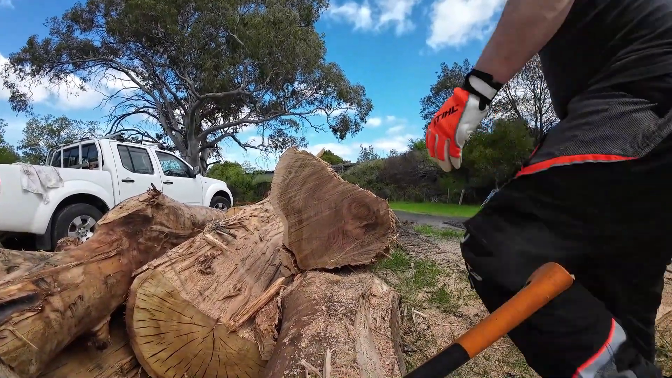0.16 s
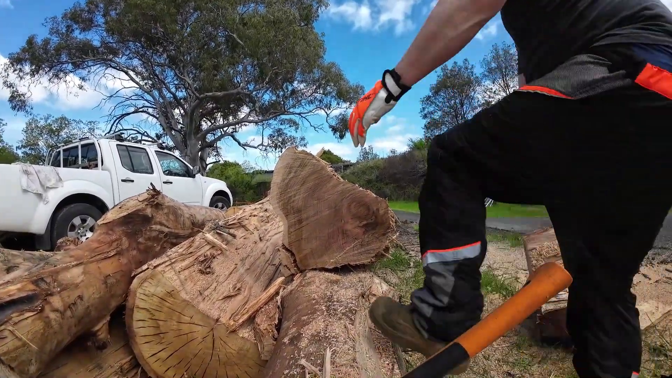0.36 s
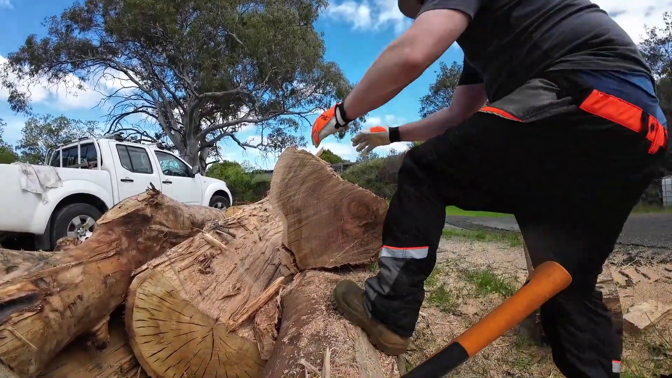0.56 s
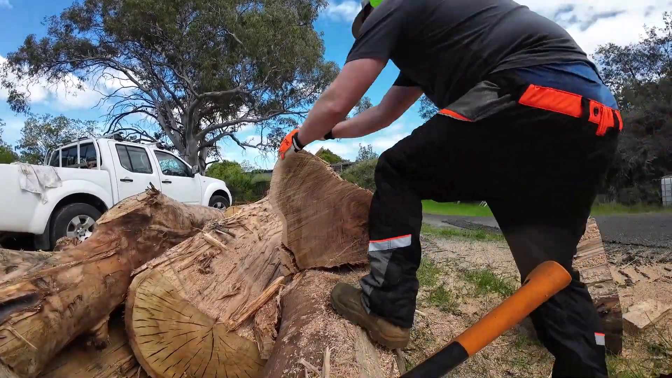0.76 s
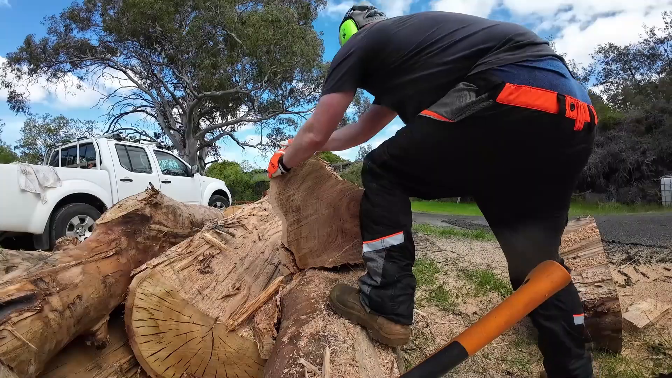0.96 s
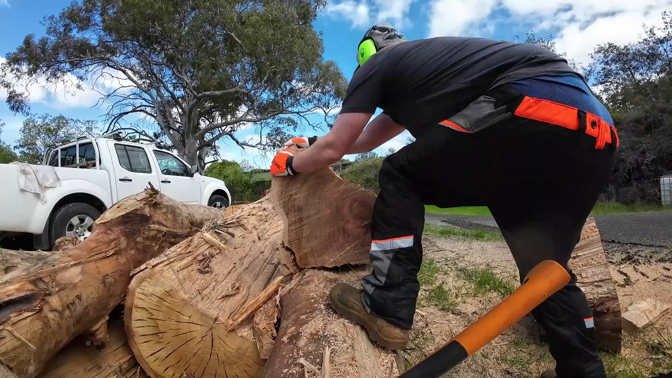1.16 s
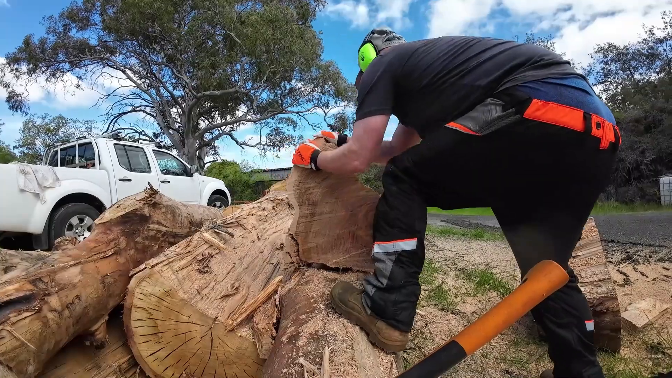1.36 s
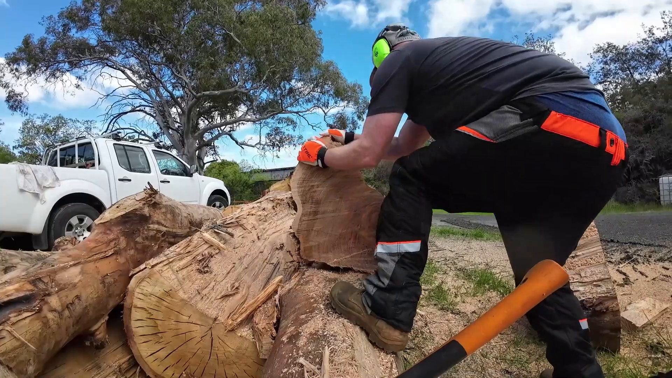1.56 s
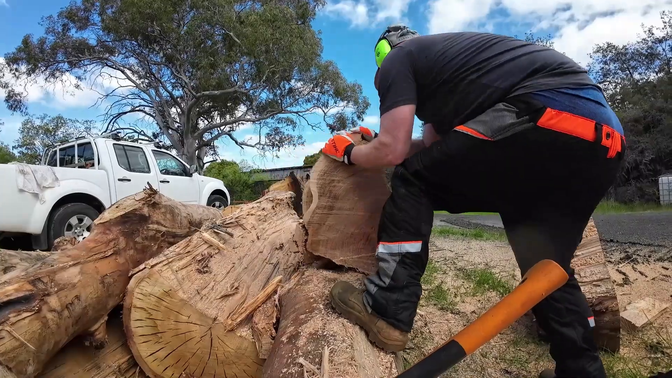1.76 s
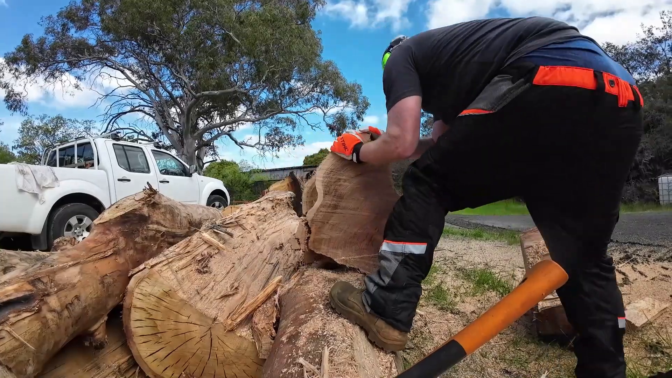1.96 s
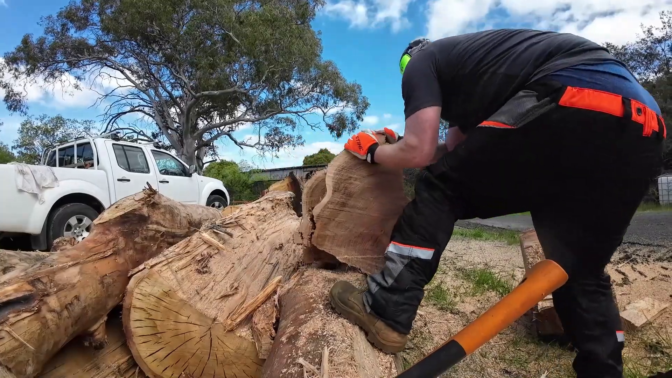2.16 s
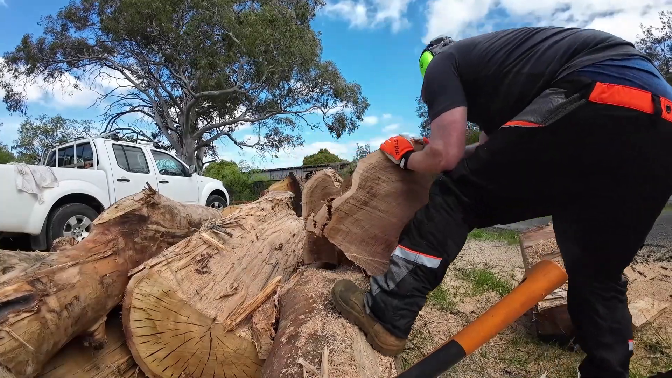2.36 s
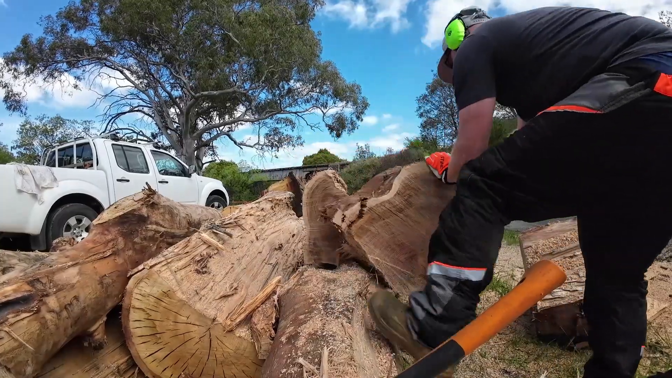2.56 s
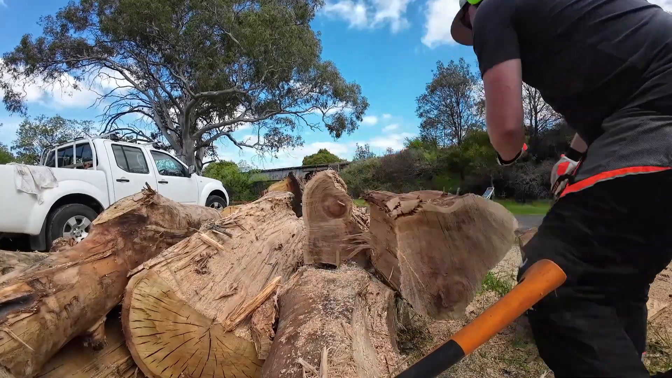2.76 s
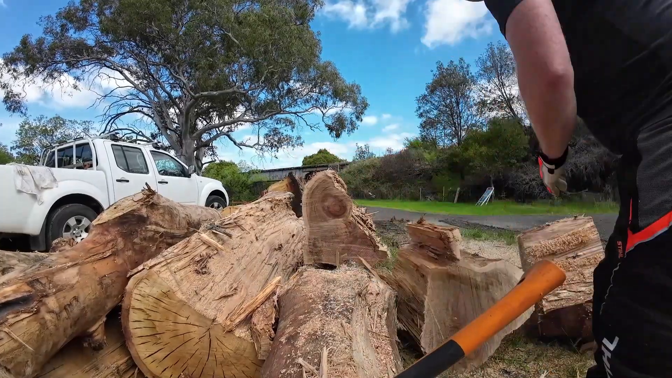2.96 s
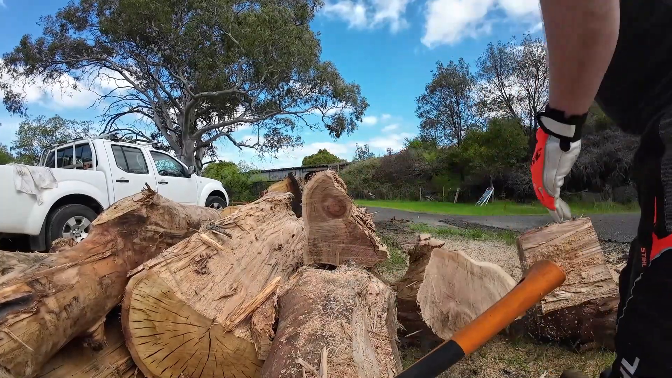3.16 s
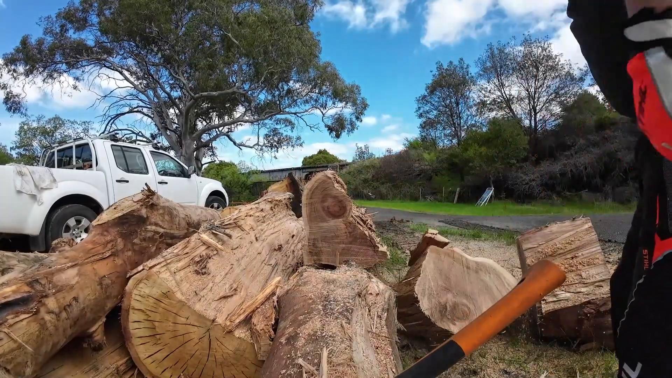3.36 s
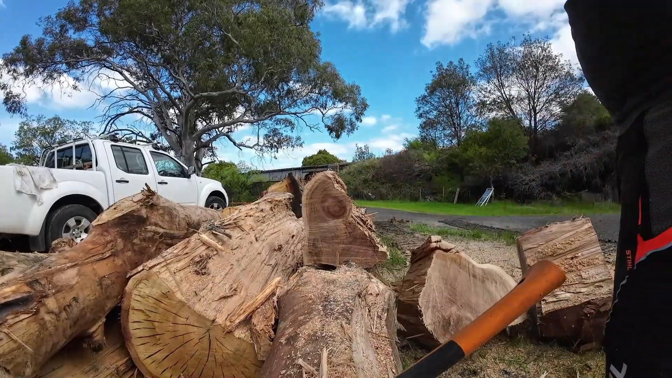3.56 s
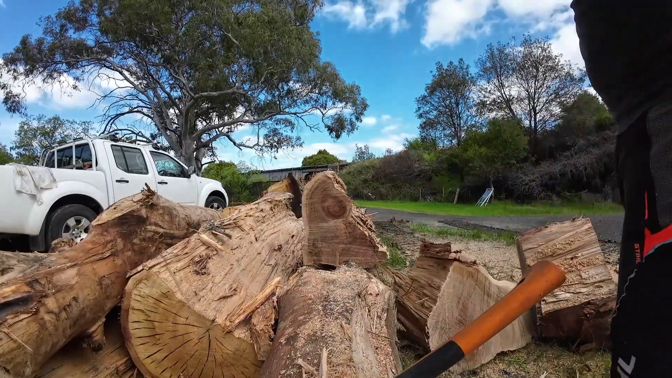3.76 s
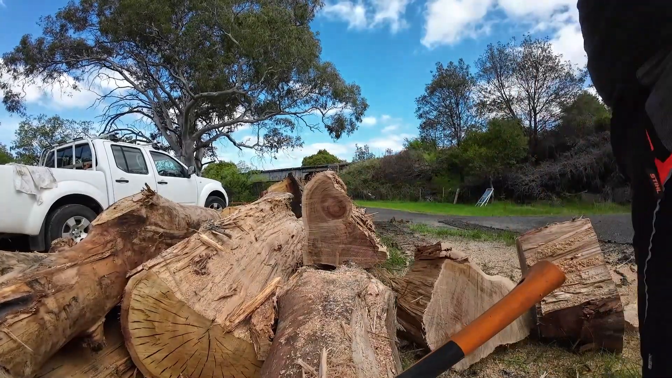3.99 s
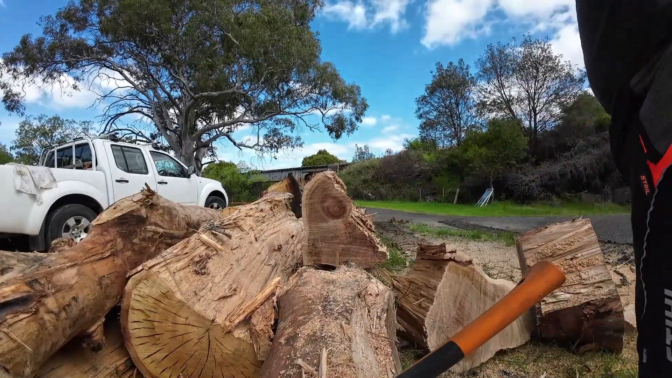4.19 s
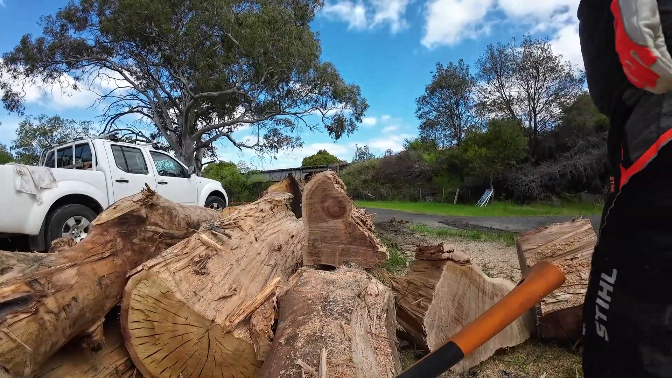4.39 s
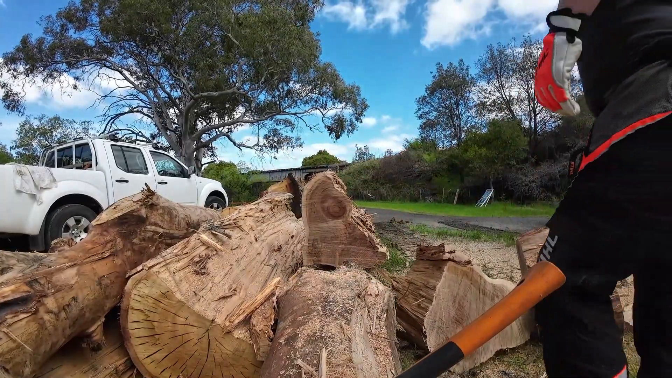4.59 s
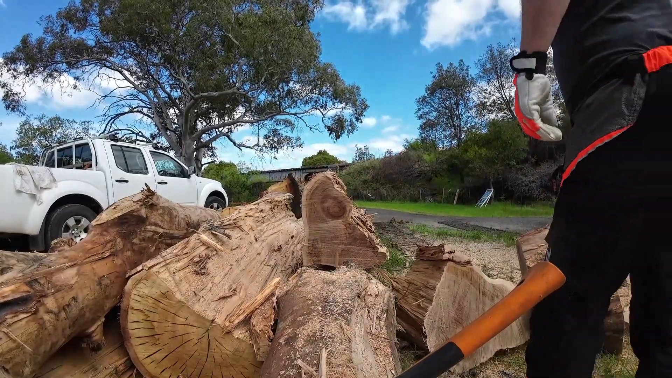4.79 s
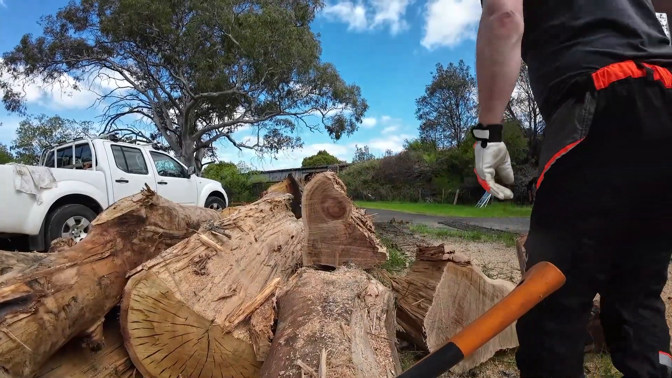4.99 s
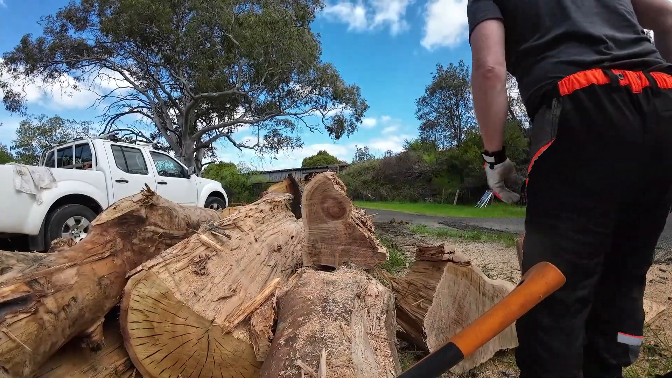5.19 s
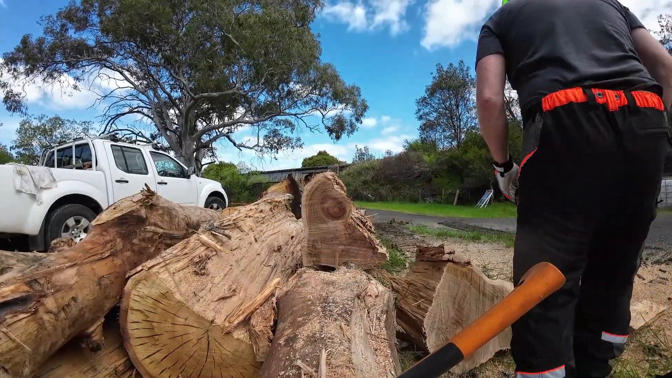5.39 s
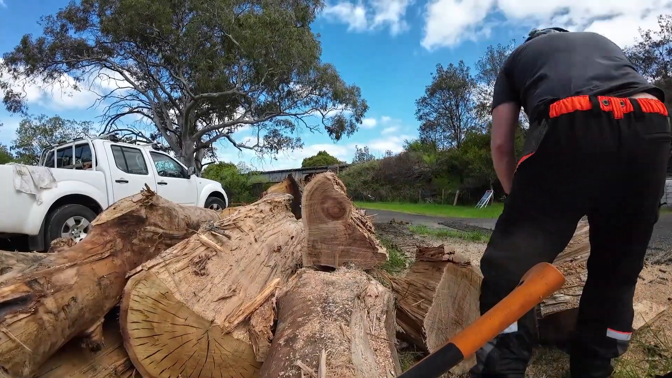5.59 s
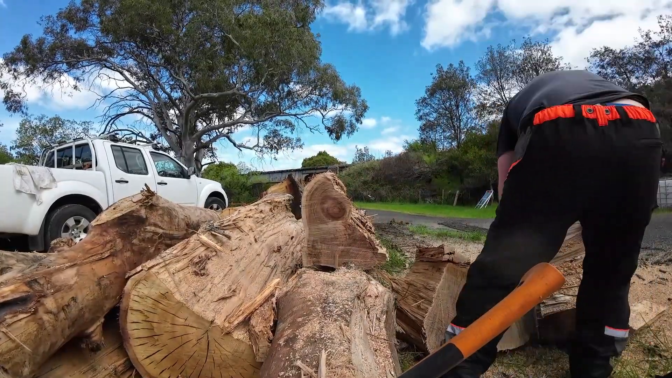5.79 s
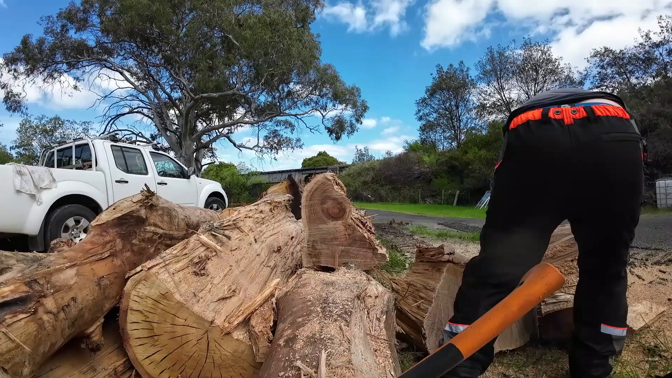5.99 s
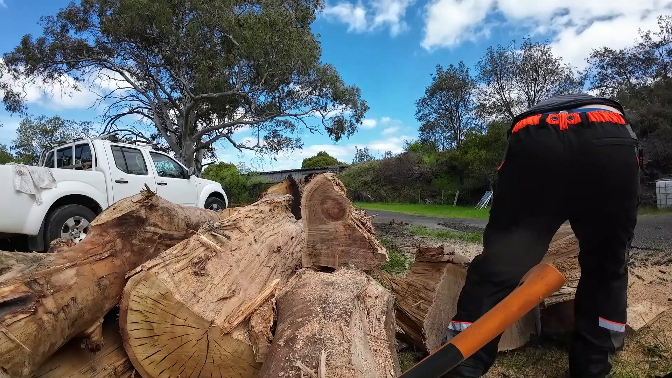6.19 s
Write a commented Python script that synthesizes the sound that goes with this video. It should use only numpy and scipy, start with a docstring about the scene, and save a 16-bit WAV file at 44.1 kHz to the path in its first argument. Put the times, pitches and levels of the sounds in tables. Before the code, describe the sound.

Close to the microphone, wood fibres snap and splinter as a split log is pulled free and scrapes against a pile. The block rolls down, knocking and crackling, and thuds onto the ground, the bumps coming through the microphone as a low rumble. Afterwards it is much quieter: soft boot scuffs, swishing trousers and a faint hum. Small birds trill, chirp and whistle further off in the breezy open air throughout.

```python
"""A light breeze blows and small birds call; boots scuff and work clothes rustle at a log pile.
From about 1 s a split round of firewood is prised off by hand: its last fibres crack and tear,
and the block rocks, grinding bark on bark. It tumbles over the pile with hollow knocks and thuds
on the ground at 3 s, each jolt shaking a camera on the pile into a deep rumble.
Then a few last scuffs, a faint low hum comes up, and the birds trill and whistle on."""
import sys
import numpy as np
from scipy import signal
from scipy.fft import rfft, irfft, next_fast_len
from scipy.io import wavfile
from scipy.ndimage import uniform_filter1d, map_coordinates

SR = 44100
rng = np.random.default_rng(int(sys.argv[2]) if len(sys.argv) > 2 else 0)


def unload_wav(signal):
    """Save mono or channel-first audio to the path in sys.argv[1] as 16-bit WAV at rate SR, clipped to [-1, 1]."""
    wavfile.write(
        sys.argv[1],
        SR,
        np.round(np.clip(np.atleast_2d(signal).T, -1, 1) * 32767).astype(np.int16),
    )


N = 275184


def amp(db):
    return 10 ** (np.asarray(db) / 20)


def unit_rms(x):
    return x / np.sqrt(np.mean(x ** 2) + 1e-20)


def along(points, hz):
    """Read a curve of (Hz, value) points on a log-frequency axis."""
    f, v = np.transpose(points)
    return np.interp(np.log(hz + 1), np.log(f + 1), v)


def bump(hz, centre_hz, octaves):
    """A bell of height 1 on the log-frequency axis."""
    return np.exp(-.5 * (np.log2((hz + 1) / centre_hz) / octaves) ** 2)


def fader(rows):
    """Gain that rides through (seconds, dB) points, silent outside them."""
    s, db = np.transpose(rows)
    return amp(np.interp(np.arange(N) / SR, s, db, left=-120, right=-120))


def stroke(s, hold, db, rise, t60):
    """Gain that climbs 60 dB in the rise seconds before time s, holds, then dies away."""
    t = np.arange(N) / SR - s
    return amp(db - 60 * np.maximum(-t, 0) / rise - 60 * np.maximum(t - hold, 0) / t60)


def swells(rows):
    """Gain of bell-shaped swells, each given as centre in seconds, dB, half length in seconds."""
    t = np.arange(N) / SR
    return sum(amp(db) * np.exp(-.5 * ((t - s) / length) ** 2) for s, db, length in rows)


def wobble(rate):
    """A smooth random curve, rate knots a second."""
    knots = np.arange(0, N * rate / SR + 1, 1 / 8)
    curve = map_coordinates(rng.standard_normal(int(knots[-1]) + 4), [knots])
    return np.interp(np.arange(N) * rate / SR, knots, curve)


def grains(rate, scatter_db, t60):
    """Envelope of tiny breaks at random times and strengths, about rate a second."""
    breaks = rng.random(N) < rate / SR
    power = np.zeros(N)
    power[breaks] = amp(scatter_db * np.minimum(rng.exponential(size=N)[breaks], 3)) ** 2
    return np.sqrt(signal.lfilter([1], [1, -amp(-60 / SR / t60) ** 2], power + 1e-12))


def even(x, size):
    """Level out the slow swells of x, over size samples."""
    return x / np.sqrt(np.abs(uniform_filter1d(np.mean(x ** 2, axis=0), size)) + 1e-12)


def tone(pitch):
    """A sine that follows a pitch in Hz."""
    return np.sin(2 * np.pi * np.cumsum(pitch) / SR)


def add(track, s, sound):
    """Mix a sound into a track from time s."""
    part = track[..., max(round(s * SR), 0):][..., :sound.shape[-1]]
    part += sound[..., :part.shape[-1]]


def filtered(x, response):
    """EQ x with a gain given as a function of Hz."""
    size = next_fast_len(N + 8192)
    return irfft(rfft(x, size) * response(np.fft.rfftfreq(size, 1 / SR)), size)[..., :N]


def causal(gain):
    """The minimum-phase response that has this gain."""
    cepstrum = irfft(np.log(np.maximum(gain, 1e-6)))
    half = len(cepstrum) // 2
    return np.exp(rfft(cepstrum * np.r_[1, np.full(half - 1, 2), 1, np.zeros(half - 1)]))


def spread(pair, likeness, colour=np.ones_like):
    """Turn mid and side into left and right; likeness holds (Hz, left-right correlation) points."""
    def response(hz):
        correlation = np.clip(along(likeness, hz), -1, 1)
        return colour(hz) * np.sqrt([(1 + correlation) / 2, (1 - correlation) / 2])
    mid, side = filtered(pair, response)
    return np.array([mid + side, mid - side])


def rush(eq, likeness, grit=1):
    """Coloured stereo noise of rms 1; grit gathers it into grains."""
    return unit_rms(spread(grit * rng.standard_normal((2, N)), likeness, lambda hz: amp(along(eq, hz))))


# Stereo image of the wood. Each row: frequency in Hz, left-right correlation.
WOOD_IMAGE = [(200, 0.97), (1200, 1), (2500, 0.99), (4400, 0.91), (8000, 0.73), (15000, 0.25)]
# Tone of breaking fibre. Each row: frequency in Hz, gain in dB.
FIBRE_EQ = [(180, -42), (330, -16.5), (600, -8), (1040, -7), (1560, -3), (2030, -4.5), (3190, -3),
            (4300, -7.5), (5700, -2.5), (6800, -7.5), (11000, -6), (15000, -14.5), (16500, -20.5)]
# Single fibres and bark flakes snapping. Each row: start in seconds, level in dB over 10 ms,
# splinter pitch in Hz, treble trim in dB.
SNAPS = [(1.01, -55, 2500, 0), (1.091, -55.5, 5500, 4), (1.243, -49.5, 1800, -19), (1.2941, -37, 1130, -3),
         (1.3084, -33, 3360, -9), (1.318, -27.5, 3000, -17), (1.3412, -20, 4440, -12.5),
         (1.3572, -35, 3000, -16), (1.3627, -25.5, 2600, -39), (1.3762, -22, 3380, -9.5),
         (1.3981, -19, 2900, -13.5), (1.4075, -33, 2500, -26), (1.4283, -24.5, 3080, -4),
         (1.4485, -28, 1660, -18), (1.464, -36, 3120, -8), (1.4738, -32, 1160, -9),
         (1.5252, -31, 3180, -14.5), (1.667, -35, 4940, 12), (1.6735, -26.5, 2480, -26),
         (1.787, -34.5, 5300, -4), (1.807, -31.5, 2630, 4), (1.8287, -33.5, 3220, -4),
         (1.8517, -35.5, 1820, -8.5), (2.001, -41.5, 5200, 4), (2.035, -37.5, 1960, -14),
         (2.055, -40, 4130, 1), (2.157, -34, 1490, -20), (2.1768, -30.5, 1900, 3), (2.2644, -24, 1820, 2.5),
         (2.4447, -36.5, 1850, -6), (2.451, -34, 1200, -5), (2.472, -27.5, 1930, 8),
         (2.531, -33.5, 5000, 0), (2.6747, -36, 6500, 3), (2.715, -27.5, 1550, -8), (2.763, -27, 5640, 5),
         (2.783, -39.5, 5000, 0), (2.884, -26, 5400, -3), (2.9263, -27, 2380, -6),
         (2.954, -21.5, 2298, -6.5), (3.0806, -26, 892, 4), (3.0945, -20.5, 1200, -0.5),
         (3.157, -33, 1220, -25), (3.178, -35.5, 1950, 6), (3.2445, -33.5, 1730, 18),
         (3.357, -43.5, 1464, -9), (3.71, -49, 5850, 18), (3.887, -40.5, 2020, -7), (3.908, -47, 5800, 7),
         (3.9222, -48, 12000, 13)]
# Bundles of fibres tearing or being crushed. Each row: start in seconds, level in dB over 10 ms,
# length in seconds, splinter pitch in Hz, treble trim in dB.
TEARS = [(1.427, -27, 0.019, 3470.0, -22), (2.1975, -18.5, 0.0035, 1625, -8.5),
         (2.576, -29.5, 0.016, 1260, -4.5), (2.629, -24.5, 0.0065, 1730, 0),
         (2.7014, -22, 0.0053, 4730, -1), (2.864, -18.5, 0.0081, 2575, -8.5),
         (2.935, -14.5, 0.0076, 1560, 5.5), (2.9435, -16, 0.0043, 2945, 1.5),
         (3.0384, -26, 0.0041, 1550.0, -3), (3.046, -18, 0.011, 895, -8.5), (3.061, -13.5, 0.016, 1730, -5),
         (3.207, -25, .005, 1145, -19)]


def cracks(snap_s=.0018, snap_t60=.015, tear_t60=.03, strain_t60=.02, hard_above_db=-28):
    """A fibre crackles under strain, lets go with a snap, tears on and rings its splinter."""
    size, lead = 4096, 400
    t = (np.arange(size) - lead) / SR
    hz = np.fft.rfftfreq(size, 1 / SR) + 1
    track = np.zeros((2, N))
    strain = amp(-17 - 60 * np.abs(t) / strain_t60)
    snaps = [(s, db, snap_s, pitch, treble_db, snap_t60) for s, db, pitch, treble_db in SNAPS]
    tears = [(*row, tear_t60) for row in TEARS]
    for s, db, length, pitch, treble_db, t60 in snaps + tears:
        tear = amp(-60 * np.maximum(t - length / 2, 0) / t60) * np.clip(t / (length / 2), .55, 1)
        force = rng.standard_normal((2, size)) * np.where(t < 0, strain, tear)
        # a strong single fibre lets go hardest; a bundle gives way gradually
        sharpness = amp(.5 * max(db - hard_above_db, 0)) * snap_s / length
        force[0, lead + int(length * SR / 2)] += 6 * sharpness
        # the wood around the break rings on, duller than the break itself
        tail = rng.standard_normal((2, size)) * (t > 0) * amp(-24 - 60 * np.abs(t) / .12)
        spectrum = rfft(force) + rfft(tail) / (1 + 1j * hz / 4000)
        # each splinter has one main resonance and its own narrow side modes
        modes_db = 3 * map_coordinates(rng.standard_normal(128), [hz / 190])
        splinter_db = 6 * bump(hz, pitch, octaves=.54) + modes_db
        shelf_db = (treble_db + 5) / (1 + (6800 / hz) ** 4)
        sound = irfft(spectrum * causal(amp(along(FIBRE_EQ, hz) + splinter_db + shelf_db)))
        rms_10ms = np.sqrt(np.sum(sound ** 2, axis=1, keepdims=True) / (.01 * SR))
        add(track, s + t[0], amp(db) * sound / rms_10ms)
    return spread(track, WOOD_IMAGE)


# Modes of the block on the pile. Each row: frequency in Hz, relative level in dB, t60 in seconds.
BLOCK_MODES = [(90, -7.5, 0.47), (131, -3, 0.14), (213.5, -1.5, 0.19), (289.3, -3, 0.093),
               (451.4, -13, 0.11)]
# Heavy blows of block and boots. Each row: time in seconds, level in dB, pitch of the push in Hz,
# ring in dB relative to the push, level of the camera shake in dB.
THUDS = [(.636, -29, 90.4, -11, -41.5), (1.345, -29.5, 88, -14, -36.5), (1.517, -9.5, 149, -11, -20.5),
         (2.435, -25.5, 89, -13, -32), (2.647, -18.5, 100, -17.5, -31), (2.801, -27, 233, -15.5, -45),
         (2.94, -26.5, 80, -10, -36), (3.0465, -3.5, 132.4, -19, -35), (3.105, -22.5, 35, -21, -42),
         (3.143, -23, 250, -16, -50), (3.211, -24.5, 280, -23, -50), (3.323, -25, 32.3, -19, -43),
         (3.792, -27, 473, -16, -66)]


def thuds(lead_s=.036):
    """A heavy blow pushes the air once; then the block rings dully on the pile."""
    track, t = np.zeros(N), np.arange(SR // 2) / SR - lead_s
    for s, db, push_hz, ring_db, _ in THUDS:
        phase = 2 * np.pi * push_hz * t
        push = -np.sin(phase) * np.exp(-(phase / np.pi) ** 2)
        ring_time = np.maximum(t - .5 / push_hz, 0)
        ring = 0
        for hz, mode_db, t60 in BLOCK_MODES:
            decay = amp(mode_db + rng.normal(0, 1.7) - 60 * ring_time / t60)
            ring += decay * np.sin(2 * np.pi * hz * rng.normal(1, .081) * ring_time)
        add(track, s - lead_s, amp(db) * (push + amp(ring_db) * ring))
    return track


def crumbs():
    """Bark crumbs of many sizes break independently, each size ticking in its own narrow band."""
    ticks = 0
    for pitch in np.geomspace(400, 11000, 9):
        breaks = grains(rate=560, scatter_db=4.4, t60=.02) * rng.standard_normal(N)
        ticks += filtered(breaks, lambda hz: bump(hz, pitch, octaves=.3))
    return np.array([ticks, np.roll(ticks, N // 2)])  # two unrelated streams for mid and side


# Tone of grinding bark, and of bright flakes and chips. Each row: frequency in Hz, gain in dB.
BARK_EQ = [(150, -18.5), (280, -1.5), (600, -10.5), (1300, -2), (2700, -4), (4400, -8), (5600, -6.5),
           (8800, -15), (11500, -9.5), (13500, -27.5), (15200, -14.5), (16500, -30.5)]
FLAKE_EQ = [(400, -31), (1500, -10.5), (3500, 0), (5500, -2), (8500, -1.5), (11000, 0), (13500, -6),
            (15200, -6), (16500, -21.5)]
# Bark rubbing on bark as the block is pulled, rocked, tipped and lands.
# Each row: start of the hold in seconds, hold in seconds, relative level in dB, t60 in seconds.
SCRAPES = [(1.32, 0.095, -39, 0.76), (1.694, 0.18, -38, 0.43), (2.193, .1, -43, .3),
           (2.292, 0.45, -39.5, 0.35), (2.614, 0.64, -38.5, 0.7), (3.074, 0.018, -28, 0.37)]


def scraping(rub_db=-3, flake_db=-8):
    """Bark grinds in gritty ticks while the block moves, and sheds sparse bright flakes."""
    rub = even(spread(crumbs(), WOOD_IMAGE, lambda hz: amp(along(BARK_EQ, hz))), size=2600)
    flakes = even(rush(FLAKE_EQ, WOOD_IMAGE, grains(rate=110, scatter_db=4, t60=.0041)), size=7000)
    motion = np.max([stroke(s, hold, db, rise=.29, t60=t60) for s, hold, db, t60 in SCRAPES], axis=0)
    return motion * (amp(rub_db) * rub + amp(flake_db) * flakes)


# Tone of the rumbling pile, and of the block's hollow body. Each row: frequency in Hz, gain in dB.
PILE_EQ = [(24, -37.5), (45, 3), (95, 4.5), (160, -10.5), (230, -10.5), (400, -25), (900, -34.5),
           (2000, -85.5)]
KNOCK_EQ = [(200, -26), (420, 3.5), (600, 4), (830, 0), (1200, 0), (2500, -30)]
# Fader ride of the block rolling over the pile. Each row: time in seconds, relative level in dB.
ROLL_RIDE = [(2.33, -46), (2.42, -34), (2.44, -26.5), (2.52, -31), (2.58, -22), (2.65, -21.5), (2.73, -34),
             (2.85, -37.5), (3.02, -42)]


def rolling(rumble_db=-6, knock_db=-45):
    """The block bumps over the pile with a low rumble and hollow knocks until it lies still."""
    rumble = amp(rumble_db) * fader(ROLL_RIDE) * even(rush(PILE_EQ, [(100, .65)]), size=2000)
    knocks = even(rush(KNOCK_EQ, WOOD_IMAGE, grains(rate=49, scatter_db=7, t60=.039)), size=6000)
    tumble = stroke(s=2.547, hold=.7, db=knock_db, rise=1.1, t60=.55)
    return rumble + knocks * tumble


# Sub-heavy tone of the camera rocking on its seat. Each row: frequency in Hz, gain in dB.
SHAKE_EQ = [(12, -22.5), (35, -6.5), (52, 1.5), (75, -11), (110, -19), (200, -33.5), (500, -61.5),
            (1500, -120)]


def camera_shake(roll_db=3.5):
    """Blows and the rolling block rock the camera, pressing its two microphones in opposite senses."""
    jolts = [stroke(s, hold=.04, db=db, rise=.067, t60=1) for s, *_, db in THUDS]
    sway = np.max(jolts + [amp(roll_db) * fader(ROLL_RIDE)], axis=0)
    return sway * even(rush(SHAKE_EQ, [(65, -.89), (200, .227)]), size=1500)


# Tone of rubbing workwear. Each row: frequency in Hz, gain in dB.
CLOTH_EQ = [(60, -19), (200, -0.5), (500, 5.5), (1500, 4.5), (3000, 9), (5500, 7.5), (8500, 5.5),
            (11000, 8), (13500, -4), (15500, 1.5), (17000, -11)]
# Boots and gloves scuffing. Each row: centre in seconds, level in dB, half length in seconds,
# body pitch in Hz.
SCUFFS = [(0.633, -45, 0.012, 364), (1.003, -53.5, 0.028, 1300), (3.576, -45.5, 0.0055, 1360),
          (3.807, -45, 0.028, 530), (4.089, -49.5, 0.024, 1460), (4.903, -53.5, 0.025, 350),
          (5.08, -53, 0.017, 302)]


def scuffs(body_db=15, size=8192):
    """A sole or glove grinds briefly: a swell of grit with a dull body."""
    t, hz = (np.arange(size) - size / 2) / SR, np.fft.rfftfreq(size, 1 / SR)
    grit = grains(rate=2200, scatter_db=11, t60=.03) * rng.standard_normal((2, N))
    track = np.zeros((2, N))
    for s, db, length, pitch in SCUFFS:
        body = body_db * bump(hz, pitch, octaves=.88)
        colour = amp(along(CLOTH_EQ, hz) + body) / np.sqrt(1 + hz / pitch)
        grind = grit[:, round(s * SR):][:, :size]
        sound = unit_rms(irfft(rfft(grind, size) * colour))
        add(track, s + t[0], amp(db) * sound * np.exp(-.5 * (t / length) ** 2))
    return spread(track, WOOD_IMAGE)


# Moves of the legs. Each row: centre in seconds, relative level in dB, half length in seconds.
SWISHES = [(.34, -63, 0.1), (.68, -62.5, 0.05), (1.05, -61.5, 0.1), (3.45, -61.5, 0.23), (3.8, -58.5, 0.12),
           (4.09, -61.5, 0.066), (5.77, -62.5, 0.11)]


def rustling(cloth_db=3, chip_db=-4):
    """With each move stiff trousers swish and a few wood chips tick underfoot."""
    cloth_image = [(1000, .9), (4000, .73), (10000, -.34)]
    cloth = rush(CLOTH_EQ, cloth_image, grains(rate=1800, scatter_db=-3, t60=.0097))
    chips = rush(FLAKE_EQ, WOOD_IMAGE, grains(rate=18, scatter_db=6.5, t60=.012))
    return swells(SWISHES) * (amp(cloth_db) * cloth + amp(chip_db) * chips)


# A trilling bird. Each row: middle of the run in seconds, note spacing in seconds, mid-run level in dB.
TRILLS = [(0.78, .0495, -49), (2.245, .048, -43.5), (4.436, .0472, -43)]


def bird_trills(note_hz=3440, fall_hz_per_s=40000, width_s=.003, count=8):
    """Runs of quickly falling notes; the first and last are softer, lower and further apart."""
    track, t = np.zeros(N), np.arange(-SR // 20, SR // 20) / SR
    tremor = 1 + .006 * wobble(600)
    fall_hz = np.clip(fall_hz_per_s * t, -190, 520)
    for s, spacing, db in TRILLS:
        for place in np.linspace(-1, 1, count):
            start = s + place * spacing * (count - 1) / 2 + .012 * place ** 3 + t[0]
            edge = np.abs(place) ** 3  # 0 in mid-run, 1 at either end
            pitch = note_hz * rng.normal(1, .0079) - 130 * edge - fall_hz
            note_db = db + rng.normal(0, 1) - 8 * edge - 1.5 * place
            note = tone(pitch * tremor[round(start * SR):][:len(t)])
            add(track, start, amp(note_db) / np.cosh(t / width_s) * note)
    return track


# A high call in two syllables, a falling chirp and then an arch.
# Each row of a syllable: seconds into the call, pitch in Hz, relative level in dB.
CALL_SYLLABLES = [
    [(0, 6800, -13), (.01, 5000, -1), (.03, 4270, -16)],
    [(.034, 6200, -19), (.043, 7740, 0), (.058, 7840, -4), (.085, 7140, -6), (.094, 6160, 4.5),
     (.104, 4540, -10)],
]
# Cues for that call. Each row: start in seconds, level in dB.
HIGH_CALLS = [(0.128, -49.5), (1.682, -50), (3.611, -46.5)]


def bird_calls(buzz=.085, full_buzz_hz_per_s=66000, flutter_db=2):
    """Nearly pure syllables that buzz where they glide fast."""
    track = np.zeros(N)
    tremor, flutter = wobble(500), amp(flutter_db * wobble(33.27))
    for start, call_db in HIGH_CALLS:
        for syllable in CALL_SYLLABLES:
            s, hz, db = np.transpose(syllable)
            t = np.arange(s[0], s[-1], 1 / SR)
            now = round((start + s[0]) * SR) + np.arange(len(t))
            pitch = np.interp(t, s, hz)
            glide = np.minimum(np.abs(np.gradient(pitch)) * SR / full_buzz_hz_per_s, 1)
            voice = tone(pitch * (1 + buzz * glide ** 2 * tremor[now]))
            envelope = amp(call_db + np.interp(t, s, db)) * signal.windows.tukey(len(t), .1)
            add(track, start + s[0], envelope * flutter[now] * voice)
    return track


# Birds further off. Each row: start in seconds, length in seconds, centre pitch in Hz, level in dB,
# glide in Hz per second.
WHISTLES = [(3.473, 0.029, 3720, -57, -4000), (4.805, 0.038, 4000, -71, 12000),
            (4.895, 0.033, 3740, -66, 7000), (5.34, 0.07, 5120, -67, -2000), (5.489, 0.28, 5580, -66, 0),
            (5.842, 0.27, 5590, -68.5, 300), (6.065, 0.046, 3900, -71, 8000)]


def bird_whistles(waver=.004, flutter_db=4.5):
    """Thin notes that glide and waver in pitch and strength."""
    track = np.zeros(N)
    drift, flutter = 1 + waver * wobble(220), amp(flutter_db * wobble(35))
    for s, length, hz, db, glide in WHISTLES:
        now = np.arange(round(s * SR), min(round((s + length) * SR), N))
        pitch = (hz + glide * (now - now.mean()) / SR) * drift[now]
        envelope = amp(db) * unit_rms(flutter[now]) * signal.windows.tukey(len(now), .3)
        add(track, s, envelope * tone(pitch))
    return track


# Tone of the open air, and of wind buffeting the microphones. Each row: frequency in Hz, gain in dB.
AIR_EQ = [(12, -28), (25, 5), (45, 3), (70, -2.5), (100, -9.5), (150, -9.5), (205, -13.5), (485, -17.5),
          (870, -20.5), (3500, -33.5), (4400, -38.5), (5500, -34.5), (8600, -44), (11000, -40.5),
          (16000, -58)]
BUFFET_EQ = [(20, 4.5), (50, 0.5), (110, -3.5), (200, -20), (500, -51)]
# Stereo image of the air. Each row: frequency in Hz, left-right correlation.
AIR_IMAGE = [(25, -0.29), (60, 1), (125, 1), (1000, 0.96), (4000, 0.73), (7000, -0.078), (11000, -0.19)]
# Puffs of wind. Each row: centre in seconds, level in dB, half length in seconds.
PUFFS = [(.4, -58, 0.45), (1.25, -47, 0.12), (2.1, -46.5, 0.37), (4.1, -46.5, 0.12), (6.15, -50.5, 0.083)]


def breeze(air_db=-47.5):
    """A bed of open-air murmur, with puffs of wind on the microphones."""
    air = amp(air_db + .282 * wobble(3.8)) * rush(AIR_EQ, AIR_IMAGE)
    puffs = swells(PUFFS) * rush(BUFFET_EQ, [(60, .2)])
    return air + puffs


# Tone of the hum, peaking near 146 Hz. Each row: frequency in Hz, gain in dB.
HUM_EQ = [(110, -48), (138, -3), (146, -2.5), (154, -3), (190, -43), (400, -120)]


def low_hum():
    """A faint, narrow band of low noise fades up and stays."""
    return stroke(s=3.9, hold=N / SR, db=-58, rise=4, t60=1) * rush(HUM_EQ, [(150, .99)])


# Decay of the yard's reverb. Each row: frequency in Hz, t60 in seconds.
YARD_DECAY = [(150, 0.42), (1500, 0.089), (5000, 0.15), (14000, 0.04)]


def yard_reverb(send):
    """Logs and trees scatter a thin tail, different at each ear."""
    hz, t, noise = signal.stft(rng.standard_normal((2, SR // 2)), SR, nperseg=256)
    decay = amp(-60 * t / along(YARD_DECAY, hz)[:, None])
    tail = signal.istft(noise * decay, SR, nperseg=256)[1]
    return signal.fftconvolve(send[None], tail / np.linalg.norm(tail[0]), axes=1)[:, :N]


def scene():
    """Wood close by, birds further off and so wetter, all over the breeze."""
    wood = cracks() + scraping() + thuds() + scuffs()
    birds = bird_trills() + bird_calls() + bird_whistles()
    reverb = yard_reverb(amp(-20) * wood.mean(axis=0) + amp(-2.5) * birds)
    mix = wood + birds + reverb + rolling() + camera_shake() + rustling() + breeze() + low_hum()
    return amp([[.29], [-.29]]) * mix  # the left microphone is a touch louder


def record(dry, ceiling=.85, top_hz=16100):
    """A soft clip rounds off the highest peaks; a steep low-pass cuts the very top."""
    rounded = dry / (1 + np.abs(dry / ceiling) ** 6) ** (1 / 6)
    return filtered(rounded, lambda hz: 1 / (1 + (hz / top_hz) ** 120))


dry = scene()
out = record(dry)
unload_wav(out)
```